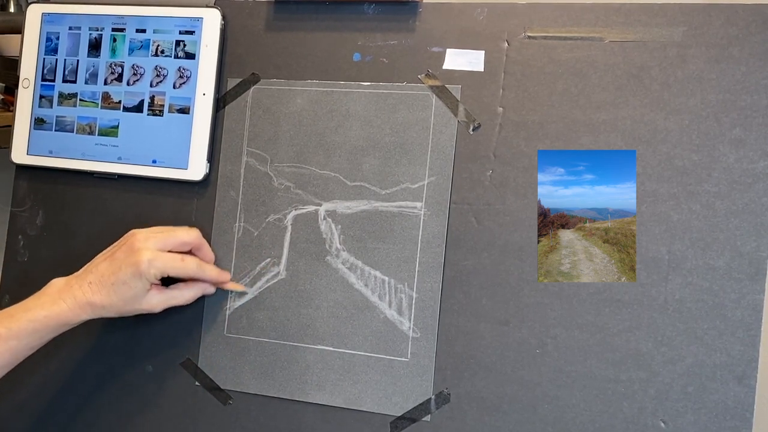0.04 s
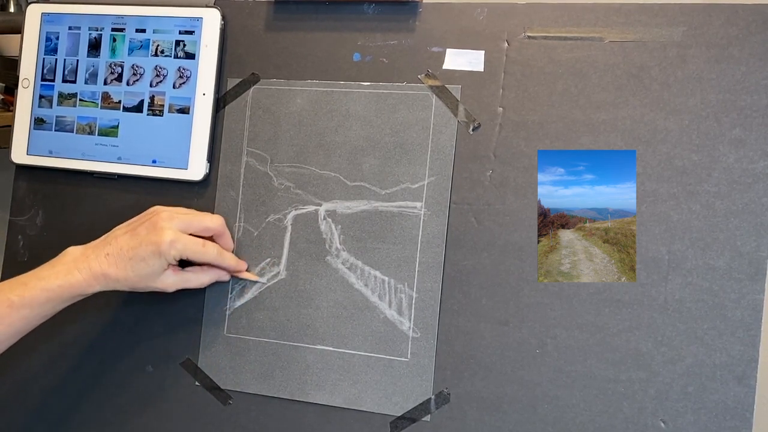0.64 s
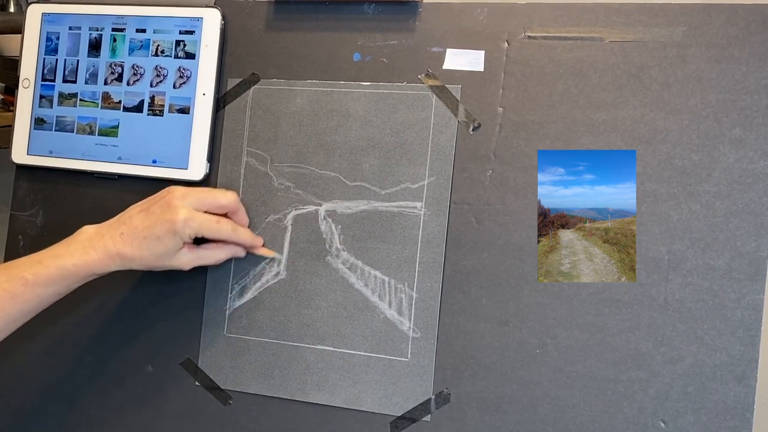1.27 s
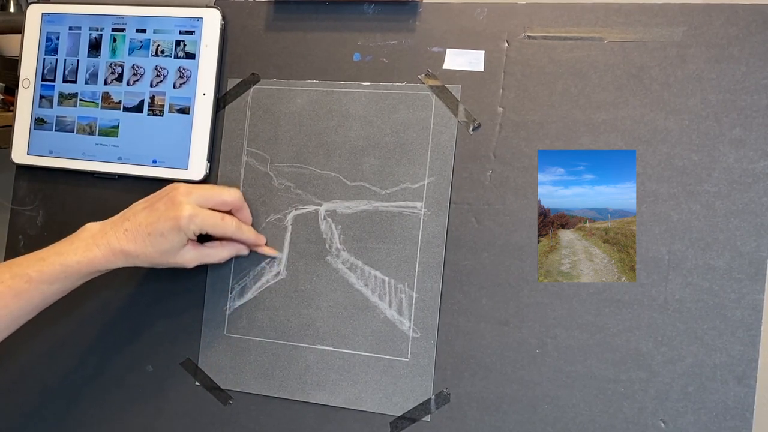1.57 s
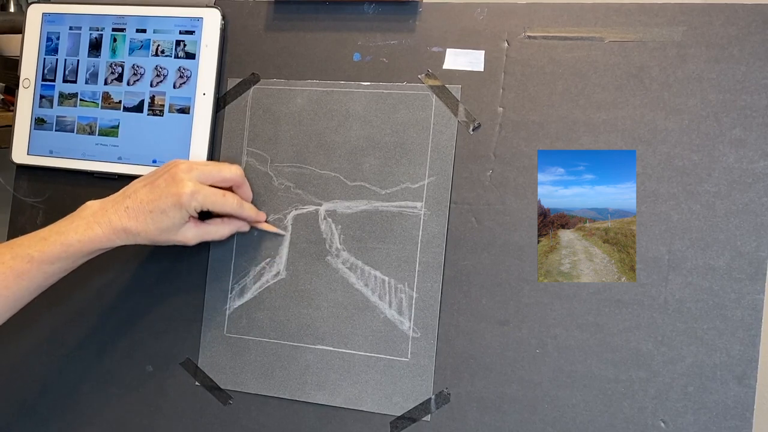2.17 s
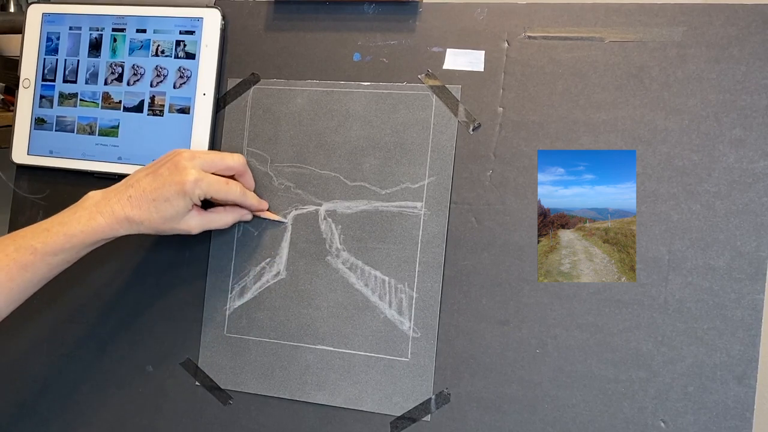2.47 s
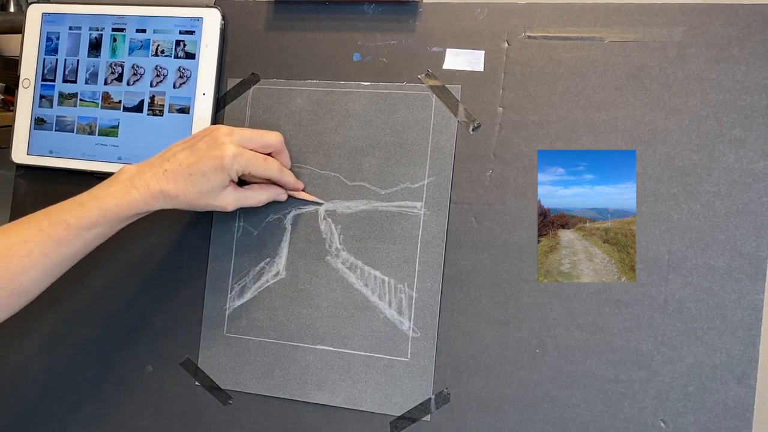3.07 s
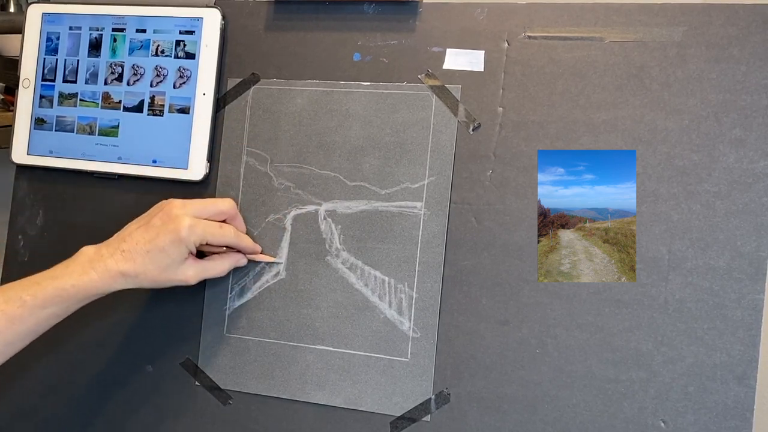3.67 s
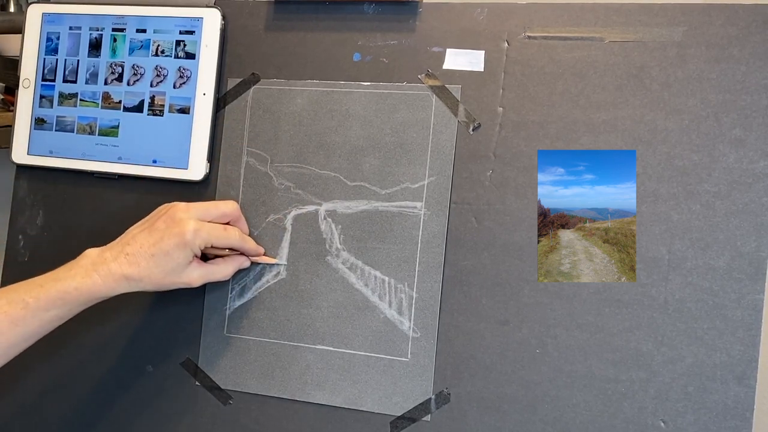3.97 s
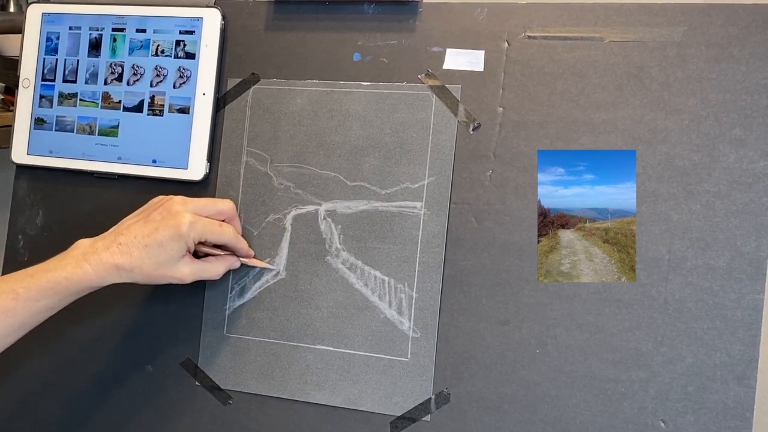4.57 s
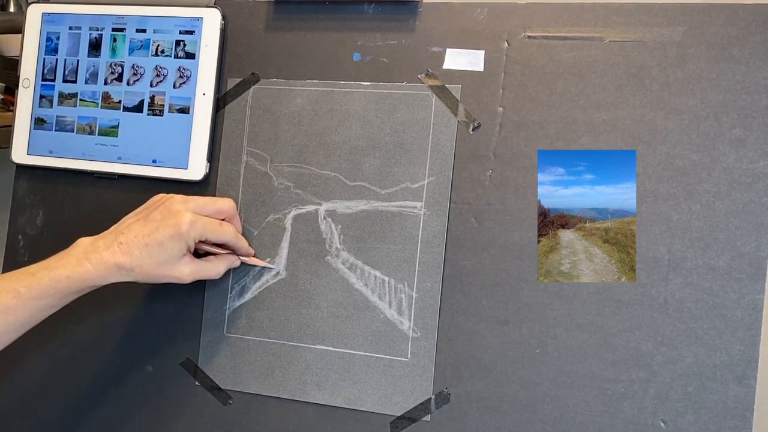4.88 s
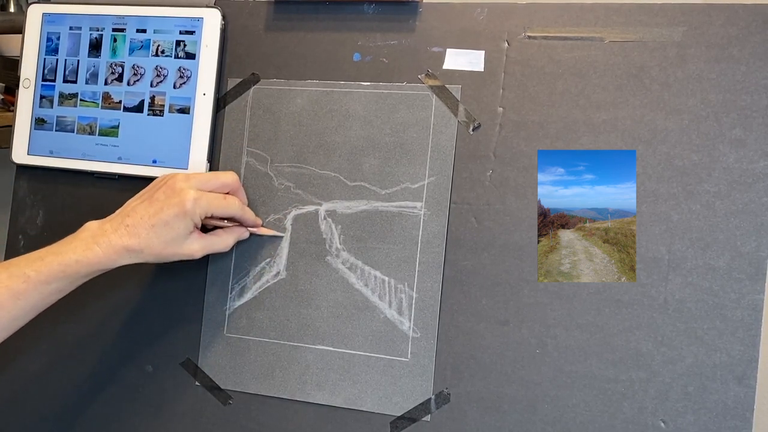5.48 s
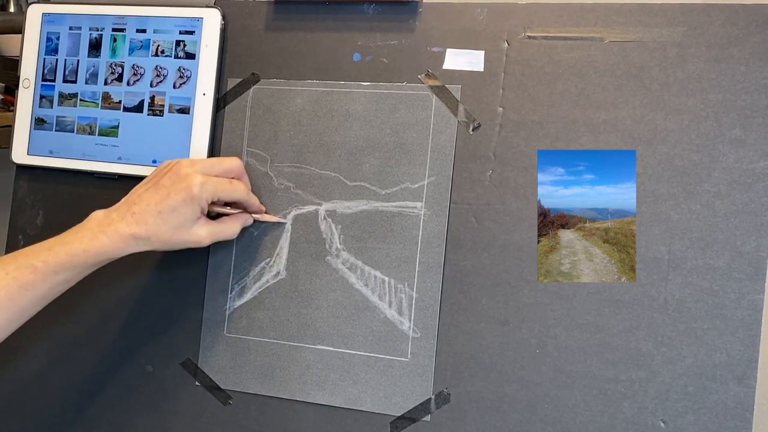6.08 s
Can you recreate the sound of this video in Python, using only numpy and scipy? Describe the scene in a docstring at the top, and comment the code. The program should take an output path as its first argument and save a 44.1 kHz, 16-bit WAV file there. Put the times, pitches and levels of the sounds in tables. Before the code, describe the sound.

From the start, a pastel pencil scratches faintly back and forth on paper lying on a drawing board, about seven short, dry strokes a second, some firmer than others. At around 2.7 seconds the hatching turns into a few slightly duller strokes, including one longer line, and stops just after 3 seconds. A pause follows until about 5.2 seconds, holding only a few very light brushes of the tip and three tiny wooden ticks of the pencil, near 3.3, 4.5 and 4.7 seconds. The pencil then draws several slower, grainy lines, soft at first and firmer from about 5.8 seconds, continuing to the end at roughly 6.3 seconds. The strokes sound close, with slight room reflections. Underneath runs a faint low rumble that slowly swells in the second half, along with a wavering appliance hum and a barely audible hiss.

```python
"""Pastel pencil on a drawing board

Quick hatching, a longer line, a pause with light touches and knocks, then slower lines.
The tip snaps over the tooth of the paper, brighter with speed; the board rings under it.
The quiet room reflects each sound and faintly rumbles, hums and hisses."""
import sys
import numpy as np
from scipy import signal
from scipy.fft import rfft, irfft
from scipy.io import wavfile

SR = 44100
rng = np.random.default_rng(int(sys.argv[2]) if len(sys.argv) > 2 else 0)


def int16_out(signal):
    """Quantize to a 16-bit WAV file."""
    q = np.round(np.clip(np.atleast_2d(signal).T, -1, 1) * 32767)
    wavfile.write(sys.argv[1], SR, q.astype(np.int16))


N = 279153
TIME = np.arange(N) / SR


def amp(db):
    """dB to gain."""
    return 10 ** (np.asarray(db) / 20)


def unit_rms(x):
    """Scale to rms 1."""
    return x / np.sqrt(np.mean(x ** 2) + 1e-20)


def at_hz(points, hz):
    """Interpolate on a log-frequency axis."""
    point_hz, value = np.transpose(points)
    return np.interp(np.log(hz + 1), np.log(point_hz + 1), value)


def envelope(points):
    """Gain per sample from (time [s], level [dB])."""
    time_s, db = np.transpose(points)
    return amp(np.interp(TIME, time_s, db))


def arch(progress, peak):
    """Rise from 0 to 1 at progress = peak, fall to 0 at progress = 1."""
    peak = np.clip(peak, 0.05, 0.95)
    triangle = np.minimum(progress / peak, (1 - progress) / (1 - peak)).clip(0)
    return np.sin(np.pi / 2 * triangle)


def wander(rate_hz, size):
    """Smooth random drift, rms 1."""
    hz = np.fft.rfftfreq(size, 1 / SR)
    lowpass = np.exp(-(hz / rate_hz) ** 2) * (hz > 0)
    return unit_rms(irfft(rfft(rng.standard_normal(size)) * lowpass, size))


def stereo_noise(spectrum, side_gain):
    """Coloured mid/side noise, rms 1."""
    gain = amp(at_hz(spectrum, np.fft.rfftfreq(N, 1 / SR)))
    mid, side = rfft(rng.standard_normal((2, N))) * gain
    return unit_rms(irfft(np.array([mid + side_gain * side, mid - side_gain * side]), N))


def minimum_phase(gain_db):
    """Causal impulse response for gains from 0 Hz to SR / 2."""
    log_gain = np.log(amp(np.r_[gain_db, gain_db[-2:0:-1]]))
    return np.fft.ifft(np.exp(np.conj(signal.hilbert(log_gain)))).real


def add(mix, start_s, sound):
    """Mix in a stereo sound, cropped to fit."""
    start = round(start_s * SR)
    sound = sound[:, max(-start, 0):]
    span = mix[:, max(start, 0):][:, :sound.shape[1]]
    span += sound[:, :span.shape[1]]


def paper_tooth(speed, snap_hz=5000, spread_db=3, dust_gain=0.8, judder_db=0.64, judder_hz=70):
    """The tip snaps over fibres, more often when fast, over a hiss of crumbling pigment."""
    size = len(speed)
    chance = snap_hz * (0.3 + speed) / SR
    heights = amp(spread_db * np.minimum(rng.exponential(1, size), 4)) * rng.choice([-1, 1], size)
    snaps = unit_rms(heights * (rng.random(size) < chance) / np.sqrt(chance))
    stick_slip = amp(judder_db * wander(judder_hz, size))
    dust = dust_gain * rng.standard_normal(size)
    return unit_rms((snaps + dust) * stick_slip)


# Board and pencil modes: (frequency [Hz], width [Hz], gain at grip 0 [dB], gain at grip 1 [dB])
BOARD_MODES = [(391, 48, 3.5, 8.5), (519, 55, 2.5, -0.5), (594.7, 34, 7, 7), (721, 72, 5.5, 3),
               (888, 71, 6, 11), (1054, 86, 7.5, 8), (1223, 44, 6.5, 3.5), (1360, 26, 7.5, 6),
               (1594, 26, -3, 5), (1797, 68, 6.5, 5.5), (1980, 27, 1.5, 4), (2073, 34, 8.5, 0.5),
               (2247, 62, 2.5, 2.5), (2349, 147, 5.5, 2.5), (2625, 220, 3.5, 3.5), (2737, 24, 2, -4.5),
               (3060, 640, 7.5, 3.5), (3350, 82, 3.5, 3), (4420, 270, 3.5, 5), (4974, 340, 7, 4.5),
               (5890, 590, 2.5, 7.5), (8180, 930, 7, 5), (11060, 690, 3.5, 6.5)]
# Pastel-on-paper friction: (frequency [Hz], gain [dB])
FRICTION_SPECTRUM = [(60, -2.5), (170, -2.5), (270, -1), (500, -1.5), (1000, -3.5), (2000, -4),
                     (3000, -9.5), (3900, -8.5), (7000, -9.5), (10000, -12), (15500, -11.5)]
BITE_HZ, THRUM_BELOW_HZ, TILT_FROM_HZ = 1720, 1230, 580


def board(tilt_db_oct, bite_db, thrum_db, grip, scatter_db=3.1, ripple_db=2.0, ripple_hz=130):
    """Impulse response of paper and board; each tip position favours the modes differently."""
    hz = np.fft.rfftfreq(4096, 1 / SR)
    mode_hz, width_hz, hatch_db, line_db = np.transpose(BOARD_MODES)
    peaks_db = hatch_db + grip * (line_db - hatch_db) + scatter_db * rng.standard_normal(len(mode_hz))
    modes_db = (peaks_db / (1 + (2 * (hz[:, None] - mode_hz) / width_hz) ** 2)).sum(1)
    # Crowded sheet modes ripple the treble.
    ripple = np.interp(hz / ripple_hz, np.arange(len(hz)), rng.standard_normal(len(hz)))
    modes_db += ripple_db * ripple * hz / (hz + BITE_HZ)
    # Tip angle and weight tilt the colour, dig in (bite) and drive the board (thrum).
    octaves = np.log2(np.maximum(hz, TILT_FROM_HZ) / BITE_HZ)
    touch_db = tilt_db_oct * octaves + bite_db * np.exp(-2 * octaves ** 2)
    touch_db += thrum_db / (1 + (hz / THRUM_BELOW_HZ) ** 4)
    return minimum_phase(at_hz(FRICTION_SPECTRUM, hz) + modes_db + touch_db)


# Growth of friction with speed: (frequency [Hz], exponent [1])
SPEED_EXPONENT = [(600, 0.74), (2000, 1.17), (5000, 1.51), (12000, 1.47)]
# Thrum peaks ahead of hiss: (frequency [Hz], factor on peak time [1])
PEAK_LEAD = [(700, 0.56), (2000, 0.74), (4000, 0.72)]


def stroke(length_s, peak, pressure_db, tilt_db_oct, bite_db, thrum_db, grip):
    """The hand speeds up and slows; the scratch swells and brightens with it."""
    t = np.arange(SR // 2) / SR
    speed = arch(t / length_s, peak)
    hz, frame_s, spectra = signal.stft(paper_tooth(speed), SR, nperseg=128)
    swell = arch(frame_s / length_s, peak * at_hz(PEAK_LEAD, hz)[:, None])
    friction = signal.istft(spectra * swell ** at_hz(SPEED_EXPONENT, hz)[:, None], SR)[1]
    return amp(pressure_db) * signal.fftconvolve(friction, board(tilt_db_oct, bite_db, thrum_db, grip))


# Hatching strokes: (turn time [s], pressure [dB], tilt [dB/oct])
HATCH_STROKES = [(-.04, -46.5, 1), (.116, -38, -2), (.267, -42.5, -1.3), (.411, -39.5, -1.34),
                 (0.544, -45.5, -.4), (.683, -43.5, 0.16), (.822, -46, .5), (.94, -41.5, 0),
                 (1.088, -46.5, 0.7), (1.202, -44.5, -0.1), (1.38, -48, 2.2), (1.507, -43.5, -0.24),
                 (1.652, -45.5, 1.5), (1.762, -46.5, 1.2), (1.966, -49.5, 0.7), (2.081, -43.5, 0.66),
                 (2.192, -48.5, -0.5), (2.326, -44, 0), (2.474, -49, -0.5), (2.546, -42.5, -0.84)]
# Away, then back: (speed peak [0-1], bite [dB], thrum [dB], grip [0 hatching, 1 line])
HATCH_DIRECTIONS = [(0.47, 0.58, 0.94, 0.28), (.33, -1.6, -1.7, .15)]
USUAL_PRESSURE_DB = -45


def hatching(end_s=2.684, longest_s=0.16, catch_delay_s=0.031):
    """Back-and-forth strokes; the tip catches after each turn, more when pressed hard."""
    ends_s = [row[0] for row in HATCH_STROKES[1:]] + [end_s]
    for k, ((start_s, pressure_db, tilt_db_oct), turn_s) in enumerate(zip(HATCH_STROKES, ends_s)):
        peak, bite_db, thrum_db, grip = HATCH_DIRECTIONS[k % 2]
        length_s = min(turn_s - start_s, longest_s)
        excess_db = pressure_db - USUAL_PRESSURE_DB
        bite_db += 0.24 * excess_db
        thrum_db -= 0.9 * excess_db  # thrum nearly independent of pressure
        yield start_s, stroke(length_s, peak, pressure_db, tilt_db_oct, bite_db, thrum_db, grip)
        catch = stroke(length_s=0.032, peak=0.62, pressure_db=-55 + 2.4 * excess_db,
                       tilt_db_oct=-1.3, bite_db=4.5, thrum_db=-5, grip=0.13)
        yield start_s + catch_delay_s, catch


# Room decay: (frequency [Hz], T60 [s])
REFLECTION_T60 = [(150, 0.9), (1000, 0.22), (4000, 0.31), (14000, 0.18)]
# Reflection colour: (frequency [Hz], gain [dB])
REFLECTION_GAIN = [(100, 4.5), (500, -5), (1300, 1), (2200, 0.5), (3500, -3.5), (14000, 0.5)]
# Reflection width: (frequency [Hz], side/mid [1])
REFLECTION_WIDTH = [(100, 0.27), (300, 0.26), (700, 0.86), (1300, 1), (2200, 0.29), (3500, 0.11),
                    (5500, 0.047), (9000, 0.34)]


def room(sound, predelay_s=0.0062, tap_chance=0.06):
    """Direct sound plus sparse reflections, new for each hand position; the bass lasts longest."""
    size = SR // 3
    taps = rng.choice([-1.0, 1.0], (2, size)) * (rng.random((2, size)) < tap_chance)
    taps *= np.arange(size) / SR > predelay_s
    hz, frame_s, (mid, side) = signal.stft(taps, SR, nperseg=256)
    width = at_hz(REFLECTION_WIDTH, hz)[:, None]
    spectra = np.array([mid + width * side, mid - width * side]) / np.sqrt(1 + width ** 2)
    decay = amp(-60 * frame_s / at_hz(REFLECTION_T60, hz)[:, None])
    decay /= np.sqrt(np.mean(decay ** 2, axis=1, keepdims=True))
    colour = amp(at_hz(REFLECTION_GAIN, hz))[:, None]
    response = signal.istft(spectra * decay * colour, SR)[1] / np.linalg.norm(taps[0])
    response[:, 0] += 1  # direct path
    return signal.fftconvolve(sound[None], response, axes=1)


# Low rumble swell: (time [s], level [dB])
RUMBLE_SWELL = [(0, -58), (1.9, -58.5), (2.9, -55), (3.5, -56), (3.9, -54), (5.1, -52.5), (5.5, -51.5),
                (6.33, -48)]
# Low rumble: (frequency [Hz], relative density [dB])
LOW_RUMBLE_SPECTRUM = [(12, -55), (24, -12.5), (36, -5), (60, -1.5), (78, 1), (90, 0.5), (112, 0),
                       (130, -2), (146, -3.5), (170, -13), (230, -36.5), (400, -73)]
# Upper rumble: (frequency [Hz], relative density [dB])
UPPER_RUMBLE_SPECTRUM = [(100, -18), (170, -5), (200, -7), (240, -4), (320, -5), (400, -10), (560, -17),
                         (750, -20), (1100, -36), (2000, -57)]


def rumble(usual_low_db=-54, usual_upper_db=-67, upper_exponent=1.66):
    """Dull room noise swells slowly, its upper band more steeply."""
    low_gain = envelope(RUMBLE_SWELL)
    upper_gain = amp(usual_upper_db) * (low_gain / amp(usual_low_db)) ** upper_exponent
    low = low_gain * stereo_noise(LOW_RUMBLE_SPECTRUM, side_gain=0.15)
    upper = upper_gain * stereo_noise(UPPER_RUMBLE_SPECTRUM, side_gain=0.5)
    return low + upper


# Appliance tones: (frequency [Hz])
HUM_TONES_HZ = [54.44, 105.06, 191.5]
# Lowest tone: (time [s], level before trim [dB])
HUM_SWELL = [(0, -55.5), (.7, -56.5), (1.3, -48.5), (2.2, -58.5), (2.7, -53), (3.6, -56.5), (4.3, -51.5),
             (4.9, -58), (6.33, -55.5)]


def appliance_hum(trim_db=(-0.5, -2.5, -19), drift_rad=(0.4, 0.9, 0.6), drift_hz=3, throb_db=0.1):
    """Three low tones waver in phase and level; the upper two swell with the rumble."""
    hum = np.zeros(N)
    for k, hz in enumerate(HUM_TONES_HZ):
        tone = np.sqrt(2) * np.sin(2 * np.pi * hz * TIME + drift_rad[k] * wander(drift_hz, N))
        swell = envelope(RUMBLE_SWELL if k else HUM_SWELL)
        hum += tone * swell * amp(trim_db[k] + throb_db * wander(drift_hz, N))
    return hum


# Hiss: (frequency [Hz], relative density [dB])
HISS_SPECTRUM = [(200, -43), (900, -1), (1800, 1.5), (3000, -6), (6000, -10.5), (10000, -13.5),
                 (16000, -23)]


def hiss(level_db=-84):
    """Faint, steady noise floor."""
    return amp(level_db) * stereo_noise(HISS_SPECTRUM, side_gain=0.18)


# Lines and closing flicks:
# (start [s], length [s], speed peak [0-1], pressure [dB], tilt [dB/oct], bite [dB])
LINE_STROKES = [(2.675, .13, 0.9, -56.5, -4, 4.5), (2.779, 0.1, 0.4, -52.5, -2.2, 3),
                (2.869, 0.21, 0.73, -45, -3, 4.5), (3.017, 0.052, 0.64, -46, -6, 3),
                (5.161, .15, 0.31, -66, 2.5, 2.5), (5.231, 0.3, 0.63, -52, -0.17, 1.5),
                (5.522, 0.27, 0.75, -52.5, 0.67, 1.5), (5.819, .13, 0.82, -44, -0.7, 0),
                (5.914, 0.21, 0.17, -47, -0.06, 3), (6.145, 0.089, .48, -56.5, -1.5, 3.5),
                (6.247, 0.25, 0.9, -41, -0.6, 1)]


def lines(rasp_above_s=0.15):
    """Single strokes; thrum stands out under a light, bright touch, and long lines start with a rasp."""
    for start_s, length_s, peak, pressure_db, tilt_db_oct, bite_db in LINE_STROKES:
        excess_db = pressure_db - USUAL_PRESSURE_DB
        thrum_db = 2.5 - 0.45 * excess_db + 2.1 * tilt_db_oct
        yield start_s, stroke(length_s, peak, pressure_db, tilt_db_oct, bite_db, thrum_db, grip=0.71)
        if length_s > rasp_above_s:
            yield start_s, shaft_rasp(0.66 * length_s, level_db=-70.5 + 0.45 * excess_db)


def shaft_rasp(length_s, level_db, mode_hz=4630, width_hz=150):
    """Tip snaps ring one narrow mode of the pencil shaft."""
    t = np.arange(SR // 2) / SR
    speed = arch(t / length_s, peak=0.47)
    resonator = signal.iirpeak(mode_hz, mode_hz / width_hz, SR)
    ring = signal.lfilter(*resonator, paper_tooth(speed))
    return amp(level_db) * unit_rms(ring) * speed


# Light touches: (start [s], length [s], time to top speed [s], pressure [dB], tilt [dB/oct], bite [dB])
TIP_TOUCHES = [(3.29, 0.11, 0.011, -67, -4, 7), (3.657, .118, .05, -60, -2.7, 0),
               (4.402, .045, .015, -73.5, -1.5, 4.5), (4.719, 0.048, .012, -75.5, 0.5, 9),
               (4.79, .116, .018, -83, 2, 9), (5.005, 0.072, 0.01, -68.5, -1.5, -2)]


def touches():
    """The hand hovers; the tip brushes the paper and trails off."""
    for start_s, length_s, rise_s, pressure_db, tilt_db_oct, bite_db in TIP_TOUCHES:
        peak = rise_s / length_s
        yield start_s, stroke(length_s, peak, pressure_db, tilt_db_oct, bite_db, thrum_db=-1, grip=0.61)


# Pencil knocks: (start [s], level [dB], lower mode [Hz], T60 [s])
PENCIL_KNOCKS = [(3.297, -63, 1700, 0.07), (4.497, -63, 2100, 0.029), (4.678, -60, 700, 0.034)]


def knocks(rise_s=0.00099):
    """The pencil shifts in the fingers; each soft blow rings a close pair of wood modes."""
    t = np.arange(SR // 4) / SR
    attack = 1 - np.exp(-t / rise_s)
    for start_s, level_db, hz, t60_s in PENCIL_KNOCKS:
        modes = np.sin(2 * np.pi * hz * t) + 0.65 * np.sin(2 * np.pi * hz * 1.07 * t)
        yield start_s, amp(level_db - 60 * t / t60_s) * attack * modes


# Left-right phase by frequency: (frequency [Hz], left lead [rad])
STEREO_PHASE = [(0, 0), (1100, 0.1), (1600, -0.3), (3100, 0.3), (5500, 0), (6800, 0), (8000, -1.8),
                (8500, -3.14), (9750, -6.28), (10350, -6.3), (11700, -9.2), (12400, -9.5), (13600, -12.4),
                (14250, -12.6), (15400, -15.3)]
# Left-right balance: (frequency [Hz], left minus right [dB])
STEREO_BALANCE = [(35, -4), (100, 0.8), (500, -0.5), (1300, 2.5), (2500, 0), (15000, 0)]


def stereo_image(sound):
    """The treble is out of step between channels, widening the sound; lower bands differ in level."""
    hz = np.fft.rfftfreq(N, 1 / SR)
    left = amp(at_hz(STEREO_BALANCE, hz) / 2)
    right = np.exp(-1j * at_hz(STEREO_PHASE, hz)) / left
    return irfft(rfft(sound) * np.array([left, right]), N)


def scene():
    """Pencil, reflections and room noise in stereo."""
    pencil = np.zeros((2, N))
    for start_s, sound in [*hatching(), *lines(), *touches(), *knocks()]:
        add(pencil, start_s, room(sound))
    return stereo_image(pencil + rumble() + appliance_hum() + hiss())


def record(dry):
    """Steep low-pass band limit."""
    cutoff_hz = 15900
    lowpass = signal.firwin(511, cutoff_hz, window=("kaiser", 9), fs=SR)
    return signal.oaconvolve(dry, lowpass[None], "same")


dry = scene()
out = record(dry)
int16_out(out)
```